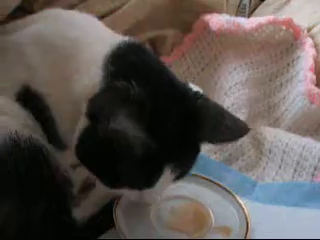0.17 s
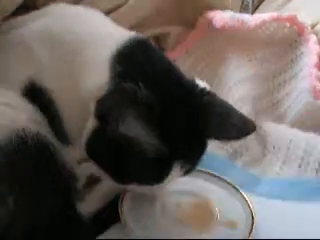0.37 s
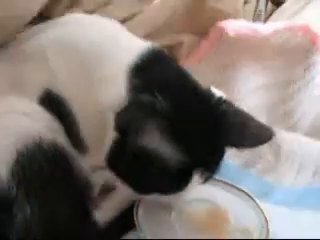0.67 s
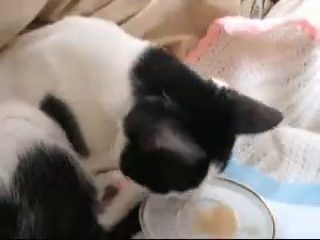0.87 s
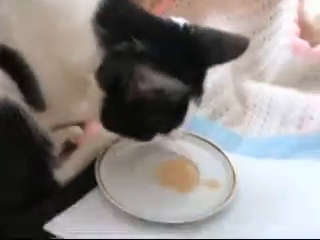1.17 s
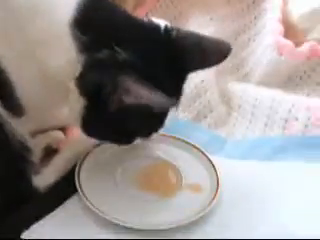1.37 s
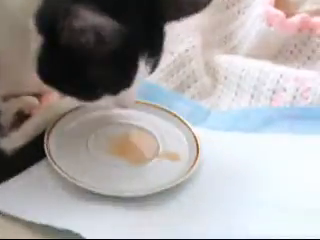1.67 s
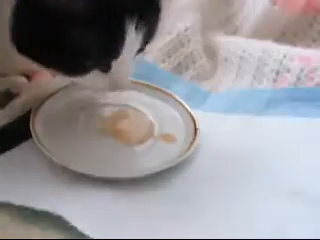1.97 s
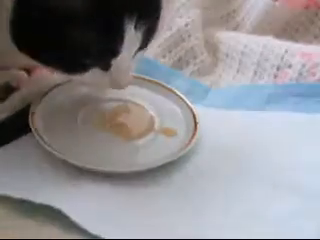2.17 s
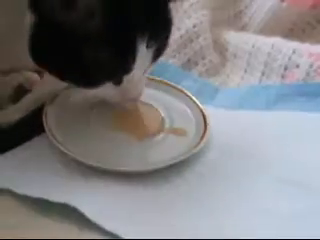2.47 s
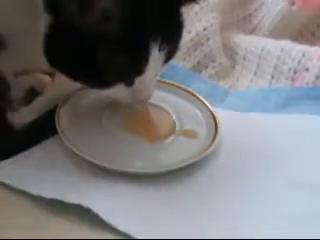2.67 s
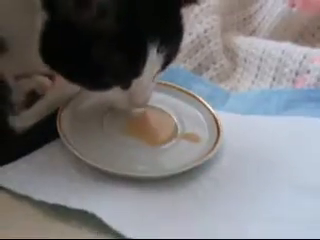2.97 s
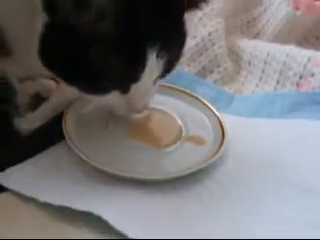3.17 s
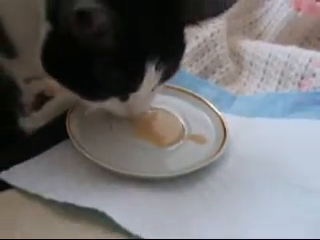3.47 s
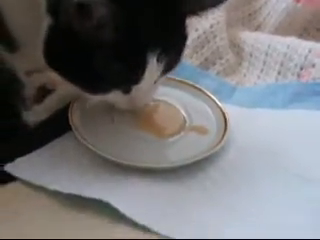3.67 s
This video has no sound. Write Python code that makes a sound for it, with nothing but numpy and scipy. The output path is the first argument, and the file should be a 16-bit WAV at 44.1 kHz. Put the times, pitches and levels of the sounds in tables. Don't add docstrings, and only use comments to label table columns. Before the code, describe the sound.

A cat licks liquid from a saucer: a few faint wet clicks, a sharper one, then a busy cluster of smacks around two seconds, and faint clicks later. Close small camera, quiet room, gritty hiss and low motor hum.

```python
import sys
import numpy as np
from scipy import signal
from scipy.io import wavfile

SR = 44100
rng = np.random.default_rng(int(sys.argv[2]) if len(sys.argv) > 2 else 0)


def wav_record(signal):
    frames = np.transpose(np.atleast_2d(signal))
    bounded = np.clip(frames, -1, 1)
    quanta = np.round(bounded * 32767).astype(np.int16)
    wavfile.write(sys.argv[1], SR, quanta)


def how_loud(loudness_db):
    steps = np.asarray(loudness_db, float) / 20
    return 10 ** steps


N = 168021
T = np.arange(N) / SR


def rms_one(x):
    return x / np.sqrt(np.mean(np.abs(x) ** 2) + 1e-20)


def drift(rate_hz):
    r = np.exp(-80 * np.pi * rate_hz / SR)
    chance = rng.standard_normal(N // 40 + 2002)
    slow = signal.lfilter([1], [1, -2 * r, r * r], chance)[2000:]
    return np.interp(np.arange(N) / 40, np.arange(len(slow)), rms_one(slow))


def ring(t, hz, t60_s):
    rise_cycles = 0.35
    swell = 1 - np.exp(-t * hz / rise_cycles)
    return np.sin(2 * np.pi * hz * t) * how_loud(-60 * t / t60_s) * swell


def mouth(t, hz):
    cycles, floor_s, longest_s = 12, 0.002, 0.0099
    return ring(t, hz, min(cycles / hz + floor_s, longest_s))


def clicks():
    # start in seconds, peak level in dB, mouth ring in Hz,
    # second ring in Hz, second ring level in dB.
    wet_clicks = [(0.189, -29, 1530, 6000, -11), (0.1933, -34.5, 3380, 5900, 2),
                  (0.315, -39, 2570, 1770, -0.5), (0.7132, -33.5, 5840, 2070, -1),
                  (1.3125, -24, 5650, 4600, -6.5), (1.8555, -33.5, 2970, 3940, -3.5),
                  (1.8780, -30, 2730, 820, -12), (1.8867, -35.5, 2950, 1695, -3.5),
                  (1.8892, -29.5, 3020, 800, -2.5), (2.025, -22.5, 1985, 2810, -0.5),
                  (2.0255, -31.5, 4350, 936, -5), (2.0613, -32.5, 2090, 3230, -9),
                  (2.1340, -31, 4970, 2500, -9.5), (2.164, -36, 2390, 4180, 0),
                  (2.2510, -23, 2130, 580, -6.5), (2.2990, -42, 4630, 2330, -8),
                  (2.309, -43, 4780, 4050, -3), (2.3377, -21.5, 1920, 4740, -4),
                  (2.337, -35.5, 1015, 610, 10), (3.4205, -35.5, 3520, 5900, -7),
                  (3.436, -38.5, 4150, 5600, 4), (3.5006, -40.5, 3300, 1270, -5),
                  (3.6126, -39.5, 1200, 2096, 3)]
    smack_hz, smack_t60_s, smack_db = 800, 0.0044, -16.5
    crack_db, crack_t60_s = -19.5, 0.0018
    length = 1000
    t = np.arange(length) / SR
    smack = how_loud(smack_db) * ring(t, smack_hz, smack_t60_s)
    crack_fade = how_loud(crack_db - 60 * t / crack_t60_s)
    out = np.zeros(N)
    for start_s, db, hz, second_hz, second_db in wet_clicks:
        cavities = mouth(t, hz) - how_loud(second_db) * mouth(t, second_hz)
        crack = crack_fade * rng.standard_normal(length)
        i = int(start_s * SR)
        out[i:i + length] += how_loud(db + 1.0) * (cavities + smack + crack)
    return out


def snaps():
    # start in seconds, peak level in dB, direction of first swing as +1 or -1.
    film_snaps = [(0.1909, -32, 1), (0.7136, -32.5, -1), (1.886, -22.5, 1), (1.8887, -29.5, 1),
                  (2.3377, -27.5, 1), (3.4151, -34, 1), (3.4208, -33, -1), (3.4379, -33, 1),
                  (3.444, -34, 1), (3.5006, -28.5, -1), (3.6124, -32.5, -1)]
    push_s, rebound = 0.00005, 0.53
    t = np.arange(-20, 60) / SR
    push = np.exp(-(t / push_s) ** 2)
    recoil = np.exp(-((t - 3 * push_s) / (3.1 * push_s)) ** 2)
    shape = push - rebound * recoil
    out = np.zeros(N)
    for start_s, db, swing in film_snaps:
        i = int(start_s * SR)
        out[i - 20:i + 60] += np.sign(swing) * how_loud(db) * shape
    return out


def slurps():
    # start in seconds, length in seconds, first pitch in Hz, last pitch in Hz, rms in dB.
    wet_strokes = [(0.193, .04, 1580, 1300, -52), (0.94, 0.21, 900, 700, -58.5),
                   (1.202, 0.15, 550, 780, -51.5), (1.87, .14, 2500, 2070, -50.5),
                   (1.86, 0.087, 3940, 4200, -56), (2.137, .045, 3667, 4180, -55.5),
                   (2.293, .075, 4540, 5100, -56.5), (2.317, .025, 1684, 2000, -44),
                   (2.343, 0.034, 1833, 1590, -51), (3.40, 0.055, 6500, 5600, -54),
                   (3.32, .2, 290, 260, -53)]
    relative_width, grain_db = 0.14, 2.0
    grain = how_loud(grain_db * drift(120))
    out = np.zeros(N)
    for start_s, length_s, hz, last_hz, db in wet_strokes:
        n, i = int(length_s * SR), int(start_s * SR)
        a, b = rng.standard_normal((2, SR // 3))
        r = np.exp(-np.pi * relative_width * hz / SR)
        body = rms_one(signal.lfilter([1], [1, -r], a + 1j * b)[1000:1000 + n])
        glide = np.exp(2j * np.pi * np.cumsum(np.linspace(hz, last_hz, n)) / SR)
        swell = np.hanning(n) ** 0.3
        out[i:i + n] += how_loud(db + 1) * swell * (body * glide).real * grain[i:i + n]
    return out


def bumps():
    # time in seconds, peak level in dB.
    dips = [
        (0.1916, -33.5),
        (0.7144, -36),
        (1.8870, -36.5),
        (2.3400, -33.5),
        (3.501, -42),
    ]
    dip_s = 0.00051
    return sum(-how_loud(db) * np.exp(-((T - s) / dip_s) ** 2) for s, db in dips)


def hum():
    # pitch in Hz, rms level in dB.
    harmonics = [
        (59.2, -52),
        (118.4, -61),
        (236.9, -60),
        (296.1, -60.5),
    ]
    wobble_db = 1.0
    out = np.zeros(N)
    for hz, db in harmonics:
        level = how_loud(db + 2.5 + wobble_db * drift(3))
        out += level * np.sin(2 * np.pi * (hz * T + rng.random()))
    return out


def whine():
    return how_loud(-69.5) * np.sin(2 * np.pi * 5941 * T)


def room():
    # frequency in Hz, density in dB per Hz.
    spectrum = [(25, -2), (70, -0.5), (200, -2), (400, -8), (750, -6), (1400, -14), (2100, -14.5),
                (6000, -20.5)]
    level_db, patchy_db = -49, 1.5
    edges = 22 * 2 ** np.arange(0, 9.1, 0.5)
    white = rng.standard_normal((2, N))
    hz, db = np.transpose(spectrum)
    out = np.zeros(N)
    for k, (low, high) in enumerate(zip(edges, edges[1:])):
        sos = signal.butter(2, [low, high], "band", fs=SR, output="sos")
        band_db = np.interp(np.log(low * high) / 2, np.log(hz), db)
        out += signal.sosfilt(sos, white[k % 2]) * how_loud(band_db + patchy_db * drift(5))
    return how_loud(level_db) * rms_one(out)


def hiss():
    return how_loud(-61.5) * rng.standard_normal(N)


def scene():
    cat = clicks() + snaps() + slurps()
    background = hum() + whine() + room() + hiss()
    return (cat + bumps() + background)[None]


def roll_off(x):
    return signal.sosfilt(signal.butter(12, 12780, fs=SR, output="sos"), x)


def record(dry):
    converter_hz, steps, offset = 16001.5, 128, -0.1045
    start_s = 0.1291
    x = signal.sosfilt(signal.butter(6, 7200, fs=SR, output="sos"), dry) + offset
    held = (np.floor(T * converter_hz) / converter_hz * SR).astype(int)
    x = np.round(x[:, held] * steps) / steps
    x = x * (T >= start_s)
    wobble_hz, wobble_db, wobble_late_s, wobble_s = 430, -27, 0.00061, 0.0012
    t = T - start_s
    wobble_swell = np.exp(-((t - wobble_late_s) / wobble_s) ** 2)
    x = x + how_loud(wobble_db) * np.sin(2 * np.pi * wobble_hz * t) * wobble_swell
    x = signal.sosfiltfilt(signal.cheby2(24, 20, 13050, fs=SR, output="sos"), x)
    return roll_off(x)


dry = scene()
out = record(dry)
wav_record(out)
```